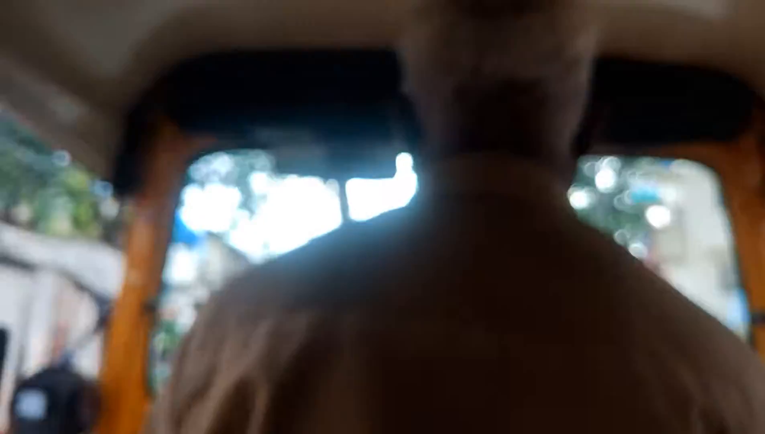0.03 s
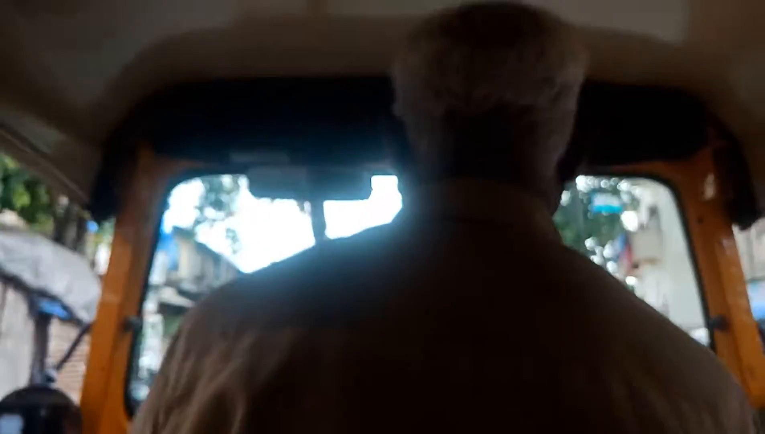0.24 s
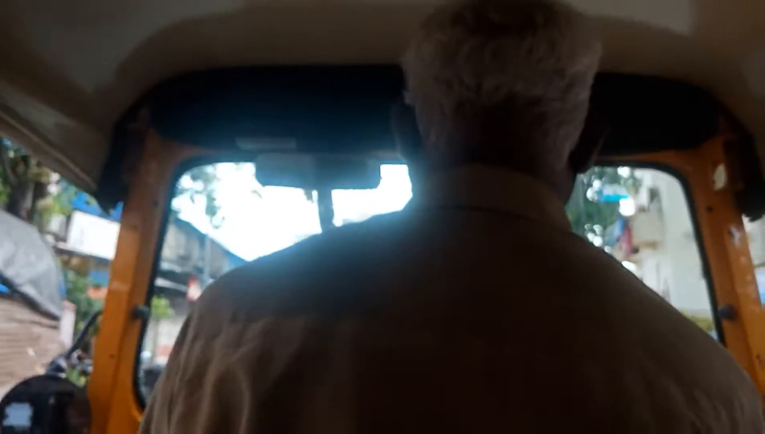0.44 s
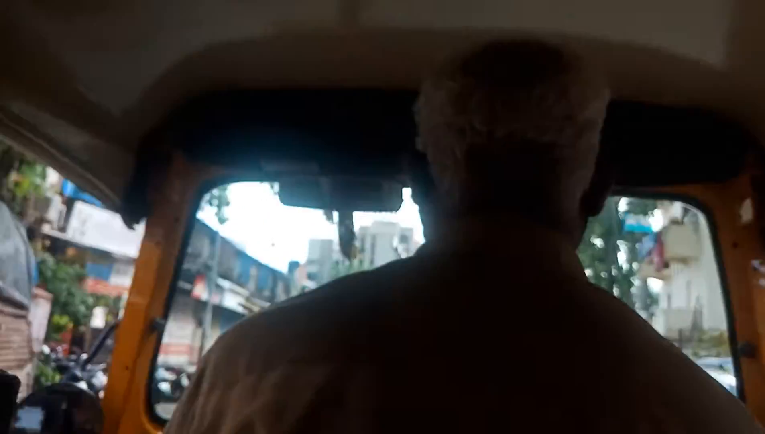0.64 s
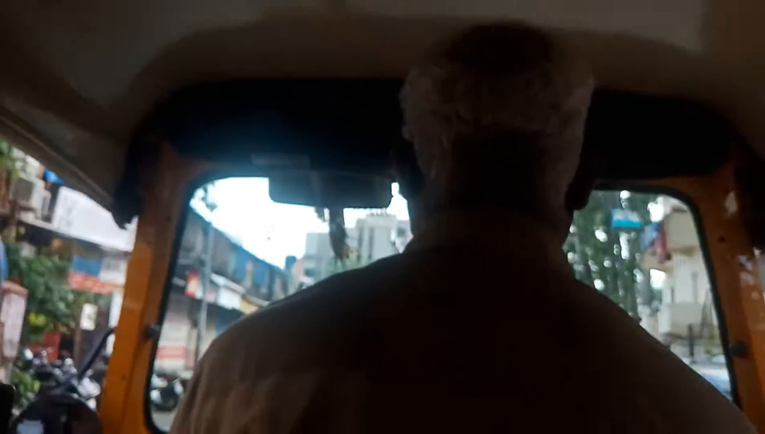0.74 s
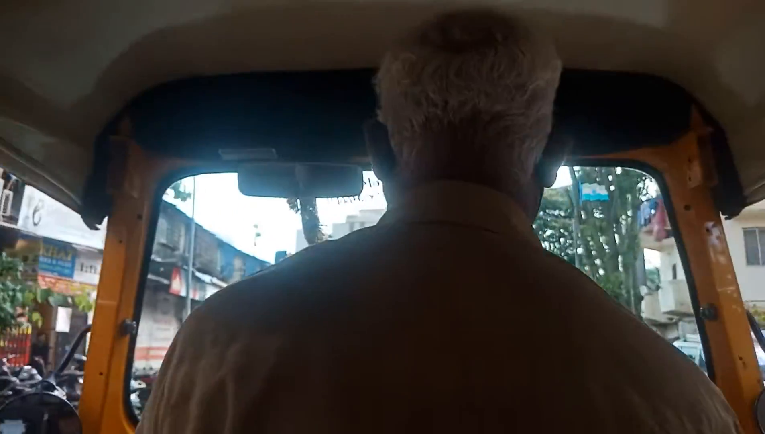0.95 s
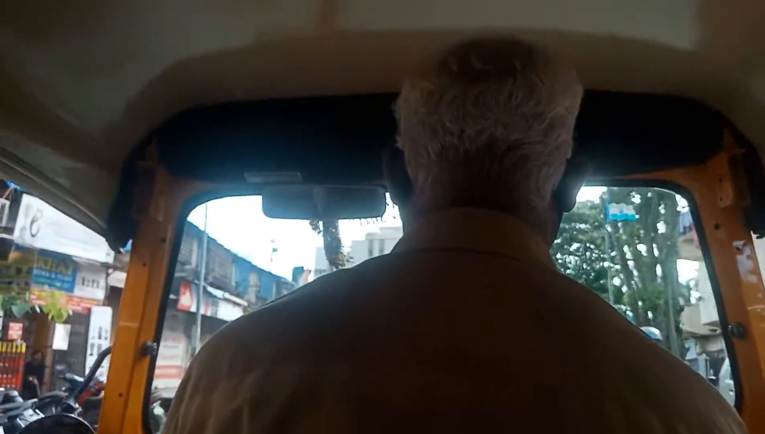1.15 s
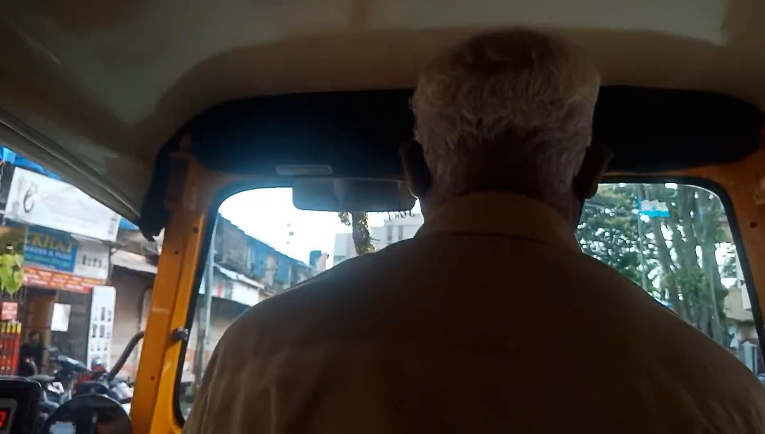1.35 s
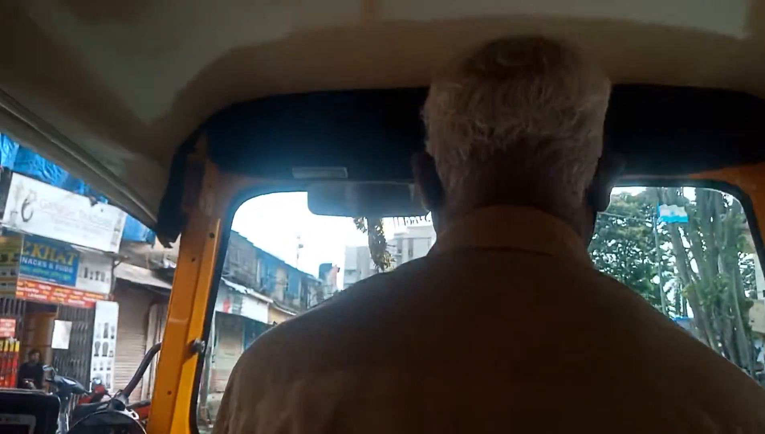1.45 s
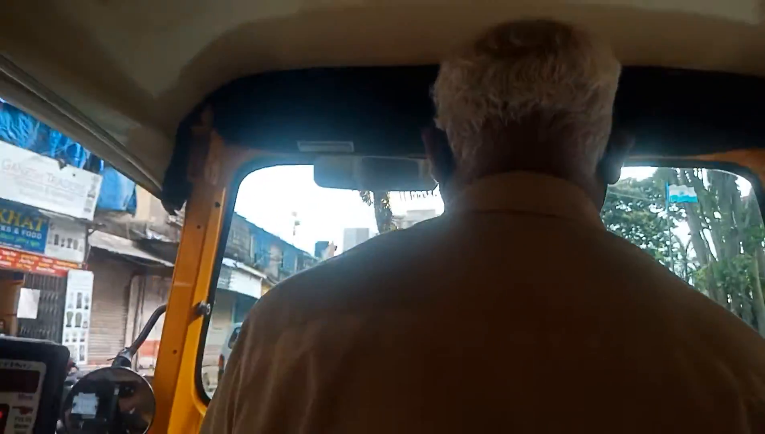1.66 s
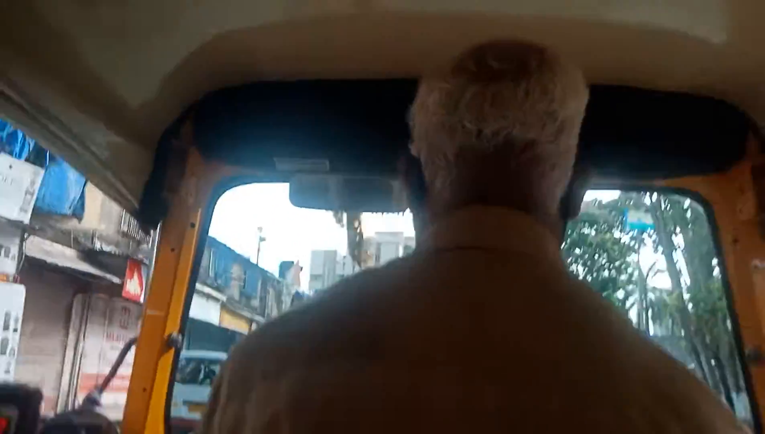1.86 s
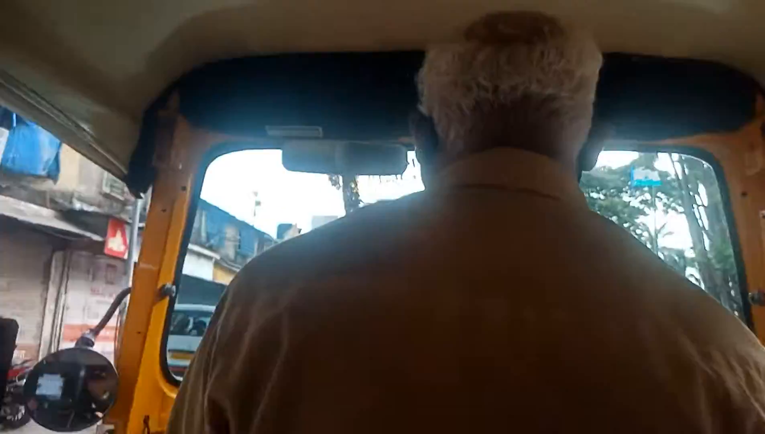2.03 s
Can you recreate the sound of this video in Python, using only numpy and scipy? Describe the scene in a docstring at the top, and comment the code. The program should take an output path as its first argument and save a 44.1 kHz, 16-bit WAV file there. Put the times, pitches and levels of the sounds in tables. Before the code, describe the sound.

Three-wheeler engine thudding and humming, its pitch sinking slightly, as the cabin booms and loose fittings chatter over a rough street. Irregular knocks and a short scrape punctuate the ride, captured by a handheld microphone behind the driver.

```python
"""Inside the open cabin of an auto-rickshaw on a rough street. The small engine thuds and drones (harmonics
of the firing rate) under the rumble and boom of the body (filtered noise). Loose panels and fittings chatter
all the time (noise through resonances) and shake harder at each bump, with a few knocks (decaying modes),
ticks (noise bursts), a scrape and short metal squeaks (narrow-band noise), and faint wavering whines.
The sound starts abruptly and swells to full level."""
import sys
import numpy as np
from scipy import signal
from scipy.fft import rfft, irfft, next_fast_len
from scipy.io import wavfile
from scipy.ndimage import uniform_filter1d, map_coordinates

SR = 44100
rng = np.random.default_rng(int(sys.argv[2]) if len(sys.argv) > 2 else 0)


def wav_record(signal):
    """Record a signal, one row per channel, as 16-bit PCM in the file named by sys.argv[1]."""
    frames = np.transpose(np.atleast_2d(signal))
    bounded = np.clip(frames, -1, 1)
    # unit amplitude maps onto the largest positive 16-bit level
    quanta = np.round(bounded * 32767).astype(np.int16)
    wavfile.write(sys.argv[1], SR, quanta)


N = 92213


def amp(db):
    """Amplitude ratio: 20 dB is a factor of ten."""
    return 10 ** (np.asarray(db) / 20)


def unit(x):
    """Normalization of the effective value: scale to rms 1."""
    return x / np.sqrt(np.mean(x ** 2) + 1e-20)


def clock():
    """Uniform sampling: the time of every sample in seconds."""
    return np.arange(N) / SR


def along(points, hz):
    """Spectral interpolation: (Hz, value) points joined on a logarithmic frequency axis."""
    point_hz, values = np.transpose(points)
    return np.interp(np.log(hz + 1), np.log(point_hz + 1), values)


def curves(rows):
    """Envelope interpolation: one value per sample for each column after the time."""
    times, *columns = np.transpose(rows)
    return [np.interp(clock(), times, column) for column in columns]


def wobble(rate):
    """Slow random modulation: a smooth curve through rate random knots per second."""
    return map_coordinates(rng.standard_normal(4096), [clock() * rate + 2], mode="wrap")


def filtered(x, response):
    """Linear filtering: the spectrum of x is multiplied by a response of frequency."""
    size = next_fast_len(N + SR // 2)
    spectrum = rfft(x, size) * response(np.fft.rfftfreq(size, 1 / SR))
    return irfft(spectrum, size)[..., :N]


def panned(x, side_db):
    """Interaural level difference: positive side_db favours the left ear."""
    return x * amp(np.array([[side_db], [-side_db]]) / 2)


def shaken(force, colour, modes=()):
    """Random excitation of a resonant body, partly correlated between the ears; the middle has rms 1."""
    # likeness of the two ears: frequency_hz, left_right_correlation
    likeness = [(60, .93), (110, .9), (200, .76), (380, .68), (690, .55), (1280, -.12), (2360, .06),
                (4350, .03), (12000, .05)]
    # level difference of the two ears: frequency_hz, left_right_db
    ear_balance = [(60, -.7), (170, -0.8), (350, -0.5), (480, .5), (620, -2.5), (800, 1), (1200, 1),
                   (1600, 3.5), (2200, 4.5), (3300, 3), (4500, 1.5), (6000, 8), (9000, -2.5), (12500, 4.5)]

    def mid_side_response(hz):
        # equal and opposite angles of the ears whose difference has this cosine
        turn = np.arccos(np.clip(along(likeness, hz), -1, 1)) / 2
        lift_db = sum(db / (1 + (2 * (hz - mode_hz) / width_hz) ** 2) for mode_hz, width_hz, db in modes)
        return amp(along(colour, hz) + lift_db) * [np.cos(turn), np.sin(turn)]

    def ear_response(hz):
        return amp(along(ear_balance, hz) * np.array([[.5], [-.5]]))

    mid, side = filtered(force * rng.standard_normal((2, N)), mid_side_response)
    pair = filtered(np.array([mid + side, mid - side]), ear_response)
    return pair / pair.mean(0).std()


def steadied(pair, span_s):
    """Envelope levelling: dividing by the local rms over about span_s leaves only the fast flutter."""
    width = max(int(span_s * SR), 2)
    power = uniform_filter1d(uniform_filter1d(pair.mean(0) ** 2, width), width)
    return pair / np.sqrt(np.abs(power) + .02)  # the floor limits the gain in quiet moments


def shifting(pair, depth_db):
    """Time-varying resonance: random narrow patches of gain, each lasting some tens of milliseconds."""
    spectra = signal.stft(pair, nperseg=1024)[2]
    patches = uniform_filter1d(rng.standard_normal(spectra.shape[1:]), size=2, axis=0)  # over frequency
    patches = uniform_filter1d(patches, size=6, axis=1)  # over time
    out = signal.istft(spectra * amp(depth_db * unit(patches)), nperseg=1024)[1][:, :N]
    return out / out.mean(0).std()


def crank():
    """Phase is the integral of frequency: firings counted since the start, slightly uneven."""
    # mean firing rate of the engine: time_s, rate_hz
    firing_rate = [(.1, 46), (.5, 46), (.8, 44.5), (1.15, 43.3), (1.4, 42.6), (1.65, 42.2), (1.88, 42),
                   (2.09, 41.4)]
    waver = .004  # share of the rate
    hz, = curves(firing_rate)
    return np.cumsum(hz * (1 + waver * wobble(25))) / SR


def kicks(turns, decay, scatter_db):
    """Impulsive excitation: a push of random strength at each whole turn, decaying over a share of a turn."""
    sizes = amp(scatter_db * rng.standard_normal(4096))
    strength = sizes[turns.astype(int) % len(sizes)]
    return unit(strength * np.exp(-(turns % 1) / decay))


def exhaust(turns):
    """Harmonic series: sinusoids at multiples of the firing rate, each wavering in strength."""
    # level of the whole drone: time_s, level_db
    drone_level = [(.12, -62), (.35, -38), (.9, -38), (1.1, -29.5), (1.36, -25.5), (1.43, -18), (1.6, -16),
                   (1.87, -16.5), (1.97, -18.5), (2.09, -15)]
    # relative mean strength of the harmonics: multiple_of_firing_rate, level_db
    orders = [(1, -29), (2, -3), (3, -14), (4, -18.5), (5, -20), (6, -26)]
    waver_db = 1
    level_db, = curves(drone_level)
    tone = np.zeros(N)
    for k, (_, db) in enumerate(orders, 1):
        strength = amp(db + waver_db * wobble(35))
        tone += strength * np.sin(2 * np.pi * (k * turns + rng.random()))
    return panned(amp(level_db) * unit(tone), side_db=-0.9)


def whines():
    """Frequency and amplitude modulation: thin, unsteady tones of the drive train."""
    # faint tones: mean_pitch_hz, level_db, left_right_db
    tones = [(425, -51, 0), (900, -44, -2)]
    pitch_waver, level_waver_db = 0.0151, 3.3  # share of the pitch, dB
    out = np.zeros((2, N))
    for pitch_hz, level_db, side_db in tones:
        strength = amp(level_waver_db * wobble(30.7))
        cycles = np.cumsum(pitch_hz * (1 + pitch_waver * wobble(39.67))) / SR
        out += panned(amp(level_db) * unit(strength * np.sin(2 * np.pi * cycles)), side_db)
    return out


def body(turns):
    """Forced vibration: the road rumbles in the frame as swelling noise and the firings thud in the cabin."""
    # strength of the frame rumble: time_s, level_db
    rumble_level = [(.12, -32.5), (.25, -24), (.35, -21.5), (.48, -18), (.59, -20.5), (.68, -15.5),
                    (.76, -23), (.85, -18.5), (.94, -24), (1.08, -16), (1.19, -18.5), (1.23, -22.5),
                    (1.39, -21), (1.55, -25.5), (1.78, -21), (1.88, -16), (1.97, -24), (2.09, -28)]
    # strength of the cabin boom: time_s, level_db
    boom_level = [(0.12, -40.5), (0.256, -26), (0.486, -23.5), (0.514, -15), (0.574, -23), (0.898, -22.5),
                  (0.914, -25), (1.162, -19.5), (1.212, -27.5), (1.326, -22), (1.342, -31.5),
                  (1.468, -17.5), (1.512, -23.5), (1.568, -20), (1.826, -22.5), (2.09, -21.5)]
    # spectrum of the rumble: frequency_hz, level_db
    rumble_colour = [(20, -50), (35, -43), (50, -49), (63, -5), (80, -6), (100, -0.5), (125, -7),
                     (170, -25.5), (400, -72.5)]
    # spectrum of the boom: frequency_hz, level_db
    boom_colour = [(60, -66), (110, -12), (135, 1.5), (185, 3), (240, -3), (310, -8.5), (380, -11.5),
                   (700, -65)]
    rumble_db, = curves(rumble_level)
    boom_db, = curves(boom_level)
    rumble = steadied(shaken(1, rumble_colour), span_s=0.085)
    thuds = 0.69 + kicks(turns, decay=0.37, scatter_db=6)
    boom = steadied(shaken(thuds, boom_colour), span_s=0.041)
    return amp(rumble_db) * rumble + amp(boom_db) * boom


def chatter(turns):
    """Contact noise excites resonances: parts buzz with the engine and clatter, harder at each bump."""
    # chatter between the bumps: time_s, panels_db, fittings_db
    base_level = [(.12, -40.5, -49.5), (.2, -34.5, -41), (.27, -33.5, -37), (.29, -22.5, -33),
                  (.42, -24.5, -31), (.55, -26, -30), (.66, -25.5, -31), (.77, -21.5, -27), (.88, -26, -33),
                  (1.02, -24.5, -31.5), (1.25, -25.5, -34), (1.4, -24.5, -32), (1.52, -25, -31.5),
                  (1.63, -24.5, -31), (1.8, -24, -29), (1.88, -25.5, -33), (1.96, -27, -34),
                  (2.09, -27.5, -32)]
    # bumps, whose power adds to the base: start_s, length_s, panels_db, fittings_db
    bumps = [(0.278, 0.021, -22, -41), (0.441, 0.072, -20.5, -50), (.52, 0.057, -22.5, -36),
             (1.042, 0.041, -27, -54), (1.195, 0.02, -27, -37), (1.309, 0.035, -28, -32),
             (1.434, 0.052, -18.5, -28.5), (1.555, 0.022, -24.5, -38), (1.652, .022, -28, -30.5),
             (1.809, 0.069, -21, -30.5), (2.073, .02, -26.5, -43)]
    # spectrum of the panels under their modes: frequency_hz, level_db
    panel_colour = [(200, 7), (340, -8.5), (420, -1.5), (500, -2.5), (630, -4.5), (900, -2.5), (1250, -7),
                    (1700, -22), (4000, -71.5)]
    # resonances of the panels: frequency_hz, width_hz, lift_db
    panel_modes = [(424, 44, 6.8), (630, 32, 8.1), (807, 36, 4.4), (912, 14, 3.6), (1086, 93, 5.8),
                   (1320, 32, 2.3), (1450, 35, 3.2)]
    # spectrum of the fittings under their modes: frequency_hz, level_db
    fitting_colour = [(600, -22), (1300, 3), (1650, 0), (2100, 0.5), (2800, -2), (3700, -5.5), (5000, -14),
                      (6000, -18), (7200, -31), (9000, -36), (11000, -48), (14500, -39)]
    # resonances of the fittings: frequency_hz, width_hz, lift_db
    fitting_modes = [(1904, 60, 5.9), (2062, 60, 5), (2400, 42, 2.5), (2540, 69, 4.3), (2800, 33, 2),
                     (3100, 75, 3.5), (3600, 65, -0.5), (3780, 35, 3.5), (4400, 30, 2.1), (4650, 60, 2.4),
                     (4935, 80, 0), (5550, 63, 5.9), (6030, 49, 1.7), (7530, 150, 7.2)]
    attack_s, release_s = .006, .016  # of a bump
    contacts_per_s, rate_spread = 210, .6  # median contact rate, its log scatter
    patch_db = 2  # rms change of the ring from moment to moment

    t = clock()
    panel_power, fitting_power = amp(curves(base_level)) ** 2
    for start_s, length_s, panel_db, fitting_db in bumps:
        rise = np.clip((t - start_s) / attack_s, 0, 1)
        shape = rise * np.exp(-np.maximum(t - start_s - length_s, 0) / release_s)
        panel_power = panel_power + (amp(panel_db) * shape) ** 2
        fitting_power = fitting_power + (amp(fitting_db) * shape) ** 2

    contact_rate = contacts_per_s * np.exp(rate_spread * wobble(170))
    contacts = kicks(np.cumsum(contact_rate) / SR, decay=0.63, scatter_db=0.5)
    firings = kicks(turns, decay=0.63, scatter_db=7.5)
    force = 1.6 + 0.76 * contacts + 0.11 * firings
    panels = shifting(shaken(force, panel_colour, panel_modes), patch_db)
    fittings = shifting(shaken(force, fitting_colour, fitting_modes), patch_db)
    return np.sqrt(panel_power) * panels + np.sqrt(fitting_power) * fittings


def knocks():
    """Modal decay: blows ring the chassis on the right; a steeper treble tilt weakens the upper modes."""
    # blows: start_s, peak_db, treble_tilt_db_per_octave
    blows = [(.265, -10, -12), (.392, -19, -6), (.881, -8, -3), (1.052, -16, -2), (1.314, -18, -12),
             (1.467, -15, -3), (1.569, -16, -8), (1.99, -17, 0)]
    # chassis modes before tilt and random scatter: frequency_hz, relative_level_db, decay_time_60_db_s
    chassis_modes = [(130, -7, .03), (255, 0, .028), (335, 1, .028), (440, -2, .02), (630, -1, .02),
                     (820, -7, .018)]
    pivot_hz, attack_s = 300, 0.0054  # the tilt acts above the pivot
    out = np.zeros(N)
    for start_s, peak_db, tilt_db in blows:
        t = np.maximum(clock() - start_s, 0)
        ring = np.zeros(N)
        for hz, level_db, t60_s in chassis_modes:
            mode_db = level_db + tilt_db * max(np.log2(hz / pivot_hz), 0) + rng.normal(0, 1.2)
            ring += amp(mode_db - 60 * t / t60_s) * np.sin(2 * np.pi * (hz * t + rng.random()))
        ring = ring * (1 - np.exp(-t / attack_s))
        out += amp(peak_db) * ring / np.abs(ring).max()
    return panned(out, side_db=-7)


def ticks():
    """Impulsive contact: hard single touches of loose metal, as decaying noise, some duller than others."""
    # contacts: start_s, level_db, extra_left_right_db, treble_tilt_db_per_octave
    touches = [(.286, -24, 0, -6), (.293, -26, 3, -3), (.464, -22, 3, -6), (.54, -19, -3, -2.5),
               (.629, -19, -2, 0), (.774, -25, 4, -1), (.798, -26, 4, -2), (1.456, -24, 2, -2),
               (1.473, -24, 1, -1), (1.668, -24, 4, -2), (1.859, -22, 1, -1)]
    # spectrum before the tilt: frequency_hz, level_db
    tick_colour = [(200, -15), (800, 0), (2500, 0), (4000, -5), (6000, -14), (9000, -33), (15000, -41)]
    pivot_hz, t60_s = 1500, .018  # the tilt acts above the pivot; time to fall by 60 dB
    t, out = clock(), np.zeros((2, N))
    for start_s, level_db, side_db, tilt_db in touches:
        force = amp(level_db - 60 * np.maximum(t - start_s, 0) / t60_s) * (t >= start_s)
        colour = [(hz, db + tilt_db * max(np.log2(hz / pivot_hz), 0)) for hz, db in tick_colour]
        force_rms = np.sqrt(np.mean(force ** 2))
        out += panned(shaken(force, colour) * force_rms, side_db)
    return out


def scrape():
    """Friction noise: one bright, rough scrape of metal that rises and fades exponentially."""
    # spectrum of the scrape: frequency_hz, level_db
    scrape_colour = [(2000, -21), (3500, -6.5), (4600, 0), (6200, -1), (7200, -11), (9300, -26),
                     (11000, -32), (14000, -30)]
    peak_s, rise_s, fall_s, level_db = .696, 0.014, 0.032, -34.5
    t = clock() - peak_s
    shape = np.exp(np.minimum(t / rise_s, -t / fall_s))
    return amp(level_db) * shape * shifting(shaken(1, scrape_colour), depth_db=0.5)


def squeaks():
    """Narrow-band friction noise: short, rough rings where metal rubs on metal."""
    # rubs, each under a bell-shaped envelope: centre_s, length_s, pitch_hz, level_db, left_right_db
    rubs = [(.701, .008, 4350, -30, 0), (.737, .012, 4750, -36, 4), (1.11, .08, 2100, -35, 5),
            (1.33, .07, 1980, -37, 5), (1.795, .06, 3780, -36.5, 4), (1.78, .04, 2520, -34, 5),
            (1.832, .02, 2370, -28, 6), (1.862, .008, 3500, -27, -3), (1.863, .008, 4200, -32, -2)]
    width = .015  # share of the pitch
    out = np.zeros((2, N))
    for centre_s, length_s, pitch_hz, level_db, side_db in rubs:
        def resonance(hz):
            return 1 / (1 + ((hz - pitch_hz) / (width * pitch_hz)) ** 2)

        ring = unit(filtered(rng.standard_normal((2, N)), resonance))
        shape = np.exp(-2 * ((clock() - centre_s) / length_s) ** 2)
        out += panned(amp(level_db) * shape * ring, side_db)
    return out


def scene():
    """Superposition: engine, body and loose parts add, all close by."""
    turns = crank()
    return exhaust(turns) + whines() + body(turns) + chatter(turns) + knocks() + ticks() + scrape() + squeaks()


def record(dry):
    """Band limitation: after a quick cut-in, the deepest bass and the highest treble are filtered out."""
    start_s, rise_s = 0.1145, 0.0037
    low_cut_hz, top_hz = 45, 15150
    gate = np.clip((clock() - start_s) / rise_s, 0, 1)
    high_pass = signal.butter(2, low_cut_hz, "highpass", fs=SR, output="sos")
    thinned = signal.sosfilt(high_pass, dry * gate)
    return filtered(thinned, lambda hz: hz < top_hz)


dry = scene()
out = record(dry)
wav_record(out)
```